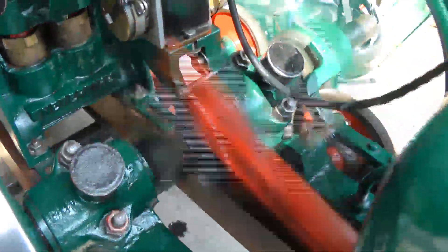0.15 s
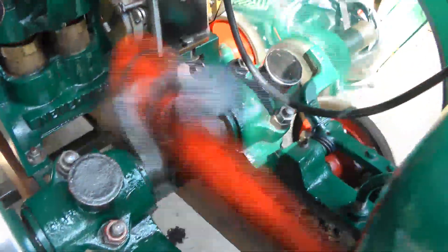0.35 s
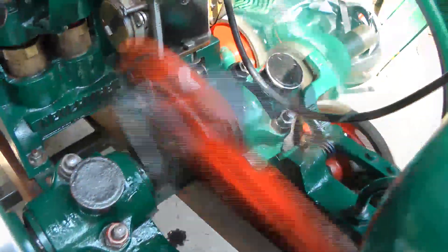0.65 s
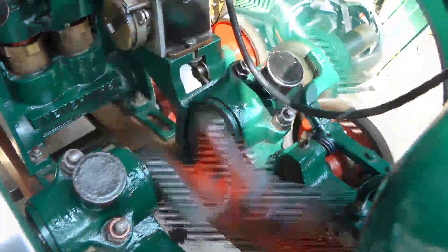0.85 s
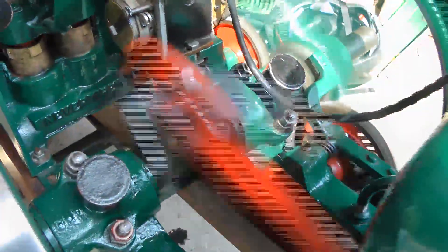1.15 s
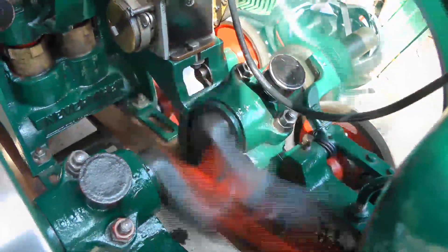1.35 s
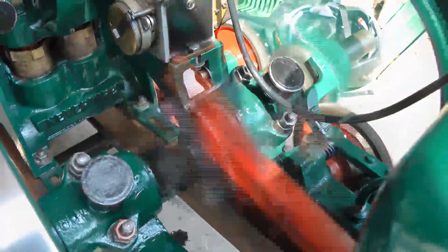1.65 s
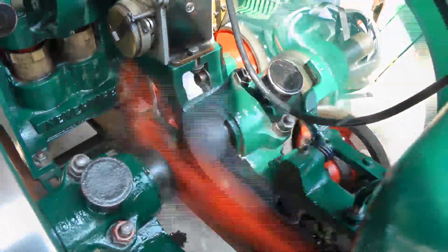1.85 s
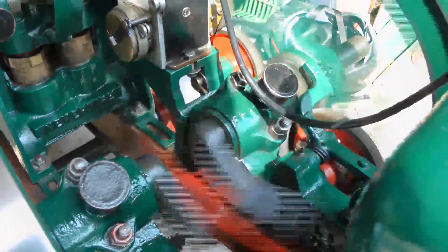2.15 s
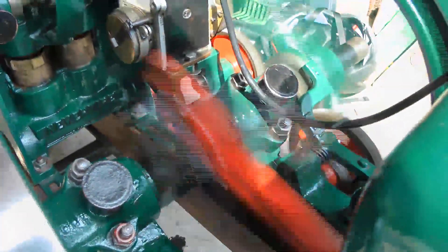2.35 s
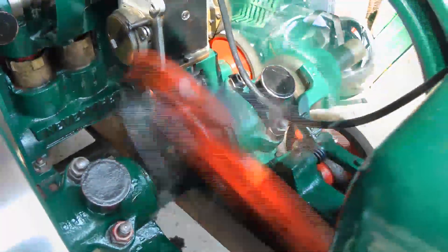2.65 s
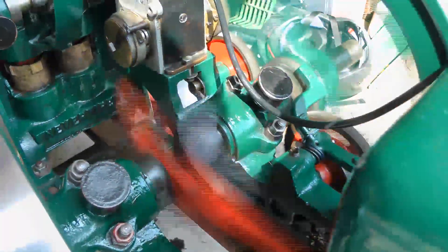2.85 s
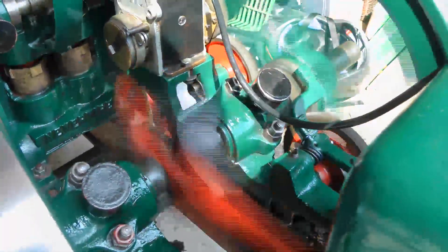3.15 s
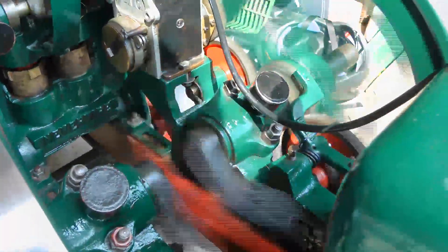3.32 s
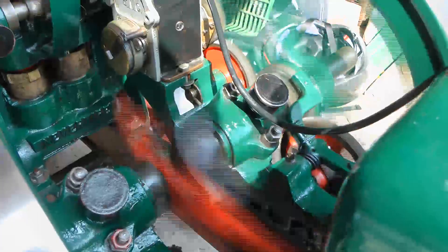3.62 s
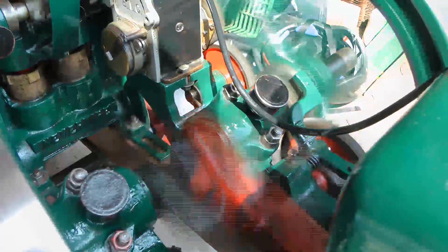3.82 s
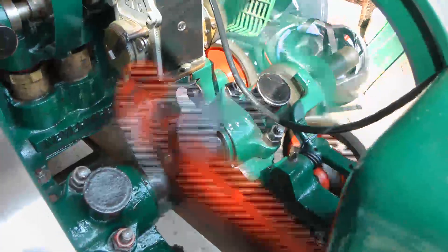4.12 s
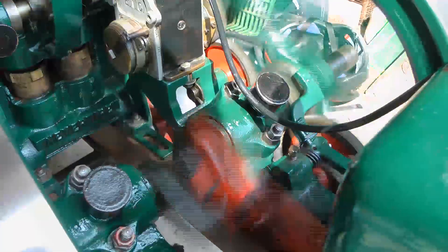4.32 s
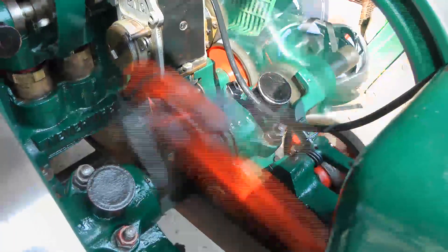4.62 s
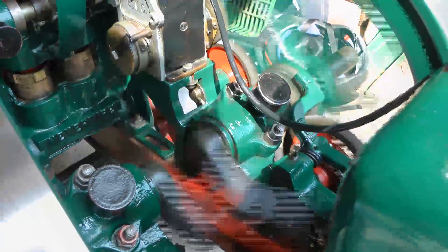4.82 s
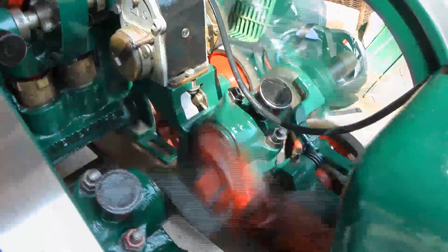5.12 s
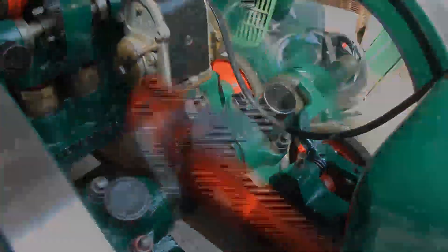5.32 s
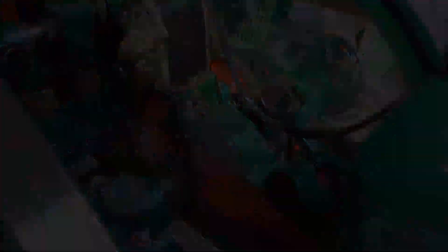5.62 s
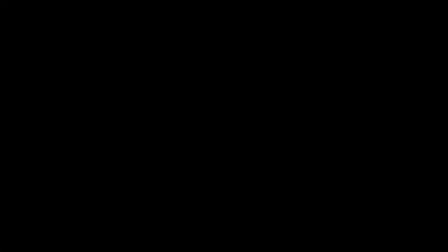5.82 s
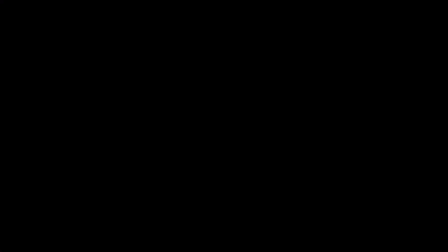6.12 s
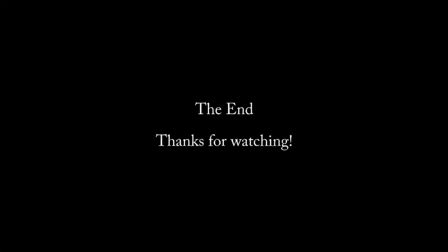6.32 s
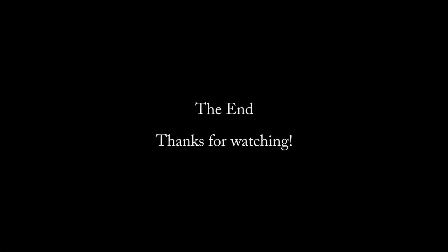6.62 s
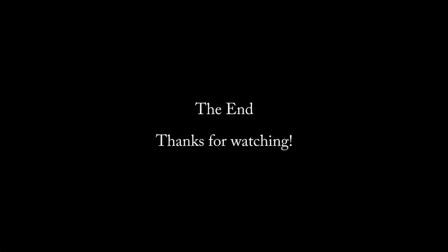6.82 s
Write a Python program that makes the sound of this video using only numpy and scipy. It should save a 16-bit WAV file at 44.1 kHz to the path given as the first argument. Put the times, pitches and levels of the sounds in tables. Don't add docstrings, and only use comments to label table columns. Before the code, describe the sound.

A loose single-cylinder engine coasts with rapid iron knocks, clacks and blown-bottle hoots, fires twice with a sharp bang, then cuts off dead.

```python
import sys
import numpy as np
from scipy import signal
from scipy.fft import rfft, irfft
from scipy.io import wavfile
from scipy.ndimage import uniform_filter1d

SR = 44100
rng = np.random.default_rng(int(sys.argv[2]) if len(sys.argv) > 2 else 0)


def magnitude_from_level(level_db):
    exponent = np.asarray(level_db, float) / 20
    return 10 ** exponent


def int16_out(signal):
    q = np.round(np.clip(np.atleast_2d(signal).T, -1, 1) * 32767)
    wavfile.write(sys.argv[1], SR, q.astype(np.int16))


N = 307597
HZ = np.fft.rfftfreq(N, 1 / SR)


def evened(x):
    return x / np.sqrt(np.mean(x ** 2) + 1e-20)


def read(points):
    hz, value = np.transpose(points)
    return np.interp(np.log(HZ + 1), np.log(hz + 1), value)


def colour(x, gain):
    return irfft(rfft(x) * gain / np.sqrt(np.mean(abs(gain) ** 2)), N)


def add(mix, s, sound):
    part = mix[..., round(s * SR):][..., :sound.shape[-1]]
    part += sound[..., :part.shape[-1]]


def dying_tone(t, hz, fall_s, phase=0):
    return np.sin(2 * np.pi * hz * t + phase) * np.exp(-t / fall_s)


def resonate(x, hz, width):
    r = np.exp(-np.pi * width / SR)
    return 2 * signal.lfilter([1 - r], [1, -r * np.exp(2j * np.pi * hz / SR)], x).real


def excite(x, modes):
    return sum(magnitude_from_level(db) * resonate(x, hz, width) for hz, width, db in modes)


def ticks(per_s, spread_db):
    size = magnitude_from_level(spread_db * np.minimum(rng.exponential(1, N), 4)) * rng.choice([-1, 1], N)
    return evened(size * (rng.random(N) < per_s / SR))


# time in seconds, length in seconds, level in dB.
GUSTS = [
    (0.612, 0.09, 17.5),
    (3.71, 0.085, 18.5),
]
# time in seconds, peak in dB.
PUFFS = [
    (0.586, -21),
    (3.68, -25),
    (5.7652, -13),
]


def draught():
    t = np.arange(SR // 10) / SR
    lumps = evened(uniform_filter1d(rng.standard_normal((2, N)), 1500))
    buffet = rng.standard_normal((2, N)) * magnitude_from_level(5.0 * lumps)
    for s, length, db in GUSTS:
        buffet = buffet * magnitude_from_level(db * np.exp(-((np.arange(N) / SR - s) / length) ** 2))
    rumble = (HZ / (HZ + 25)) ** 2 / (1 + (HZ / 90) ** 2)
    out = magnitude_from_level([[-52.5], [-50.5]]) * evened(colour(buffet, rumble))
    for s, db in PUFFS:
        add(out, s, -magnitude_from_level(db) * dying_tone(t, 90, 0.0032) * np.ones((2, 1)))
    return out


# pitch in Hz, width in Hz, level in dB.
FRAME = [(763, 340, -3), (1127, 12, 1.5), (1344, 53, 2.5), (2000, 61, 1.5), (2252, 29, 6.5),
         (2690, 35, -0.5), (3352, 8.2, -5.5), (3945, 65, -2.5), (4835, 415, 1), (5230, 36, -2),
         (6150, 70, -4)]


def frame(x, ring_db):
    return x + magnitude_from_level(ring_db) * excite(x, FRAME)


# pitch in Hz, width in Hz, level in dB.
SMALL_PARTS = [(8410, 240, 9.5), (9390, 100, 8), (10700, 84, 4.5), (11530, 100, 11.5), (12900, 120, 2),
               (15300, 330, 3)]
ROD_HZ, ROD_T60_S = 3507, 0.14
LATCH_HZ, LATCH_T60_S = 7420, 0.12
# time in seconds, level in dB.
CHATTER = [(0, -19), (.45, -21), (.6, -21.5), (.85, -24), (1.05, -19.5), (1.2, -17), (2.9, -20), (3.7, -19),
           (3.95, -25.5), (4.12, -19.5), (4.27, -18), (5.7, -19), (6.39, -18.5)]
# frequency in Hz, level in dB per Hz.
GEARS = [(59, -48.5), (100, -21), (294, -10.5), (370, -7.5), (448, -6), (1620, -7), (3470, -4.5),
         (5890, -13), (7590, -12.5), (8090, -20), (14000, -36), (15400, -33)]


def chatter():
    s, db = np.transpose(CHATTER)
    rattle = signal.lfilter([1], [1, -np.exp(-1 / (0.0051 * SR))], abs(ticks(110, 1.2)))
    drive = evened(ticks(3000, 2.0) + 0.7 * rng.standard_normal(N))
    drive = drive * (.42 + rattle / rattle.std() * .38)
    body = frame(colour(drive, magnitude_from_level(read(GEARS))), 0.66)
    body += 0.077 * excite(drive, SMALL_PARTS)
    body += 9.2 * resonate(drive, ROD_HZ, 18) + 4.3 * resonate(drive, LATCH_HZ, 45)
    body += 3.5 * resonate(drive, 1124, 7.5) + 3.6 * resonate(drive, 1341, 9.9)
    return evened(body) * magnitude_from_level(np.interp(np.arange(N) / SR, s, db) + 1.13)


# time in seconds, hoot in dB, chuff in dB.
STROKES = [(0.088, -19.5, -18.5), (0.253, -21.5, -29), (0.411, -19, -19), (0.993, -21, -22.5),
           (1.116, -19.5, -18), (1.235, -20.5, -16), (1.369, -14.5, -20), (1.492, -16.5, -15),
           (1.628, -17, -24), (1.745, -17, -19), (1.894, -18, -24.5), (2.03, -19.5, -17.5),
           (2.167, -16.5, -17), (2.307, -18, -15.5), (2.445, -18, -22.5), (2.59, -18.5, -17.5),
           (2.737, -20, -24), (2.887, -16.5, -16), (3.034, -21, -26), (3.189, -18, -15), (3.34, -19, -20),
           (3.494, -20, -16.5), (3.965, -27, -32), (4.068, -22, -24), (4.206, -19, -23), (4.325, -16, -16),
           (4.458, -18.5, -24), (4.585, -18, -14.5), (4.719, -18, -22.5), (4.853, -18, -17.5),
           (4.986, -17.5, -23.5), (5.124, -17.5, -17), (5.259, -17, -20.5), (5.401, -17, -17),
           (5.544, -18, -23.5), (5.686, -18.5, -15), (5.832, -21.5, -23), (5.985, -20, -19),
           (6.128, -19.5, -22), (6.288, -16, -15)]
# seconds from the thump, hoot in dB, chuff in dB.
GULPS = [
    (-0.236, -20.5, -27),
    (-0.202, -17, -26.5),
    (-0.128, -27, -32),
    (-0.046, -23.5, -35.5),
    (0.072, -24.5, -28.5),
]


def hoot_list():
    gulps = [(thump_s + s, db, chuff_db) for _, _, thump_s, _ in FIRINGS for s, db, chuff_db in GULPS]
    return [*STROKES, *gulps]


def hoots():
    tone, chuff, t = np.zeros((2, N)), np.zeros(N), np.arange(SR // 8) / SR
    swell = (t / 0.022 * np.exp(1 - t / 0.022)) ** 4.0
    turns = np.cumsum(376 * (1 + .45 * np.exp(-t / 0.0053))) / SR
    side_lead = np.array([[.45], [-.45]])
    for s, db, chuff_db in hoot_list():
        hoot = swell * np.sin(2 * np.pi * (turns + rng.random()) + side_lead)
        add(tone, s - .024, magnitude_from_level(db + 3.0) * hoot)
        add(chuff, s - .04, magnitude_from_level(chuff_db + 2.0) * swell)
        add(tone, s - .026, magnitude_from_level(db - 4.5) * dying_tone(t, 390, 0.012))
        add(tone, s - .022, magnitude_from_level(chuff_db - 15.0) * dying_tone(t, 110, 0.0045))
    flutter = evened(uniform_filter1d(rng.standard_normal(N), size=400))
    tone = tone * (1 + 0.15 * flutter)
    low_breath = HZ / 800 / (1 + ((HZ - 800) / 300) ** 2)
    high_breath = 0.35 * HZ / 2400 / (1 + ((HZ - 2400) / 900) ** 4)
    air = colour(rng.standard_normal(N), low_breath + high_breath)
    return tone * magnitude_from_level([[-.6], [.6]]), evened(air) * chuff


# time in seconds, big end knock in dB,
# delay of the cam in ms, cam blow in dB, big end knock a turn later in dB.
CYCLES = [(-0.16, -9, 30, -5, -9), (0.148, -4, 27.5, 1, -4), (0.4613, -3, 28.7, 1, -9),
          (0.78, -17, 18, 1, -9), (1.0263, -5, 24.4, 0.5, -4), (1.279, -0.5, 24.5, 1, -2),
          (1.5365, -1, 20.7, -0.5, -7.5), (1.8006, -1.5, 32, -1, -5), (2.0715, -1, 27, -1.5, -3),
          (2.3511, -1, 25, -1, -4.5), (2.638, -3.5, 27, 0, -9.5), (2.935, -3, 25.4, 1.5, -4.5),
          (3.2344, -3.5, 34, 0, -1.5), (3.55, -1.5, 31, -1.5, -9), (3.869, -20.5, 15.3, 0, -10.5),
          (4.1154, -5, 25, -2.5, -5.5), (4.368, -0.5, 29, 0.5, -8.5), (4.627, -1, 26.6, 0.5, -3.5),
          (4.896, -2, 24.3, -1, -6), (5.1654, -3, 29.3, 0.5, -6), (5.442, -2.5, 31.3, 1.5, -6.5),
          (5.731, -4, 29.4, 0.5, -12), (6.0276, -4, 28, 0, -5), (6.3337, -3.5, 31.5, 1, -9)]


def coasting():
    cycles = []
    for row, after in zip(CYCLES, CYCLES[1:]):
        fires = any(0 < thump_s - after[0] < .03 for _, _, thump_s, _ in FIRINGS)
        if not fires:
            cycles.append((row[0], after[0] - row[0], row))
    return cycles


def big_end_knocks():
    second_turn = 0.496
    again = [(s + second_turn * length, row[-1]) for s, length, row in coasting()[1:]]
    return [(s, db) for s, db, *_ in CYCLES[1:]], again


def cam_blows():
    return [(s + ms / 1000, db) for s, _, ms, db, _ in CYCLES[1:]]


def ring(events, mode_hz, t60, beat_hz):
    out, t = np.zeros(N), np.arange(SR // 4) / SR
    luck = rng.random((len(events), 2))
    grit = np.diff(uniform_filter1d(rng.standard_normal((len(events), len(t) + 1)), size=3))
    for (s, db), (a, b), noise in zip(events, luck, grit):
        hz = mode_hz + (b - .5) * beat_hz
        pair = np.sin(2 * np.pi * (hz * t + a)) + .5 * np.sin(2 * np.pi * ((hz + beat_hz) * t + b))
        tone = magnitude_from_level(-60 * t / t60) * pair * np.minimum(t / 0.0024, 1)
        tick = 0.58 * noise * np.exp(-t / 0.0014)
        add(out, s - .002, magnitude_from_level(db + 0.5) * (tone + tick))
    return out


# time in seconds, peak in dB.
ROD = [(0.3232, -9), (0.655, -12), (0.69, -12.5), (0.7477, -20), (0.9323, -9), (1.118, -10), (1.262, -14),
       (1.4316, -17), (1.8262, -9.5), (2.066, -18), (2.2393, -6.5), (2.3526, -13), (2.4523, -15.5),
       (3.04, -8.5), (3.075, -16.5), (3.105, -9), (3.3273, -16), (3.4131, -15), (4.022, -17), (4.2088, -13),
       (4.5116, -16), (4.79, -19), (4.8638, -18), (5.055, -14.5), (5.115, -18.5), (5.27, -15.5),
       (5.468, -10.5), (5.55, -10), (5.7533, -14), (5.907, -14),
       (0.0184, -21), (0.1077, -15), (0.2962, -18.5), (0.4105, -18.5), (0.5681, -16), (1.038, -16),
               (1.1777, -17.5), (1.7489, -22), (1.8986, -15), (1.956, -16), (2.5092, -23.5), (2.5371, -17),
               (2.7447, -14.5), (2.8953, -14), (2.9492, -16.5), (3.4545, -18), (3.6346, -15.5),
               (4.597, -18.5), (4.7207, -21), (4.9711, -19), (5.4181, -17.5), (5.6885, -18.5),
               (5.8396, -16), (6.2013, -17.5)]
LATCH = [(0.0887, -12.5), (0.3227, -7.5), (0.4843, -11), (0.5681, -10.5), (0.6843, -13.5), (1.1812, -14),
         (1.4301, -15), (1.5085, -14), (1.7484, -15), (1.8248, -18), (2.0188, -14.5), (2.2373, -15.5),
         (2.7427, -9), (2.8739, -12), (3.1043, -8), (3.4126, -9), (3.496, -12), (4.3281, -15.5),
         (4.7137, -12.5), (4.8464, -20.5), (4.9137, -13.5), (4.9731, -14.5), (5.2624, -12), (5.5473, -12),
         (5.6825, -14), (5.8167, -12.5), (6.04, -16.5), (5.875, -14.5), (6.2063, -15), (6.3599, -18.5),
         (0.2553, -19.5), (0.3035, -13), (0.7297, -15.5), (0.7532, -12.5), (0.888, -16.5),
                 (1.2353, -14), (1.3625, -16), (1.5562, -18.5), (1.6297, -20), (1.9568, -14.5),
                 (2.157, -21), (2.2932, -13), (2.4488, -18), (2.5855, -21), (2.6628, -15.5), (3.039, -18),
                 (3.0766, -19.5), (3.1346, -17), (3.226, -18), (3.258, -17.5), (3.3278, -17),
                 (3.9434, -19.5), (4.1335, -21.5), (4.2567, -14.5), (4.6503, -16), (4.8633, -13),
                 (5.0538, -20.5), (5.112, -15.5), (5.6115, -18.5), (5.9848, -17.5), (6.137, -26),
                 (6.2801, -21)]


def rod_and_latch():
    rod = [*ROD, *[(s, db - 21.5) for s, db in cam_blows()]]
    latch = LATCH
    return ring(rod, ROD_HZ, ROD_T60_S, 19) + ring(latch, LATCH_HZ, LATCH_T60_S, 44.2)


def clonks(rows, modes, rise_s, wander_hz):
    out, t = np.zeros(N), np.arange(SR // 10) / SR
    hz, mode_db, t60 = np.transpose(modes)[..., None]
    for (s, db), luck in zip(rows, rng.standard_normal((len(rows), 2, len(modes), 1))):
        fall = np.minimum(t / rise_s, 1) * magnitude_from_level(db + mode_db + 3.0 * luck[0] - 60 * t / t60)
        tones = np.sin(2 * np.pi * (hz + wander_hz * luck[1]) * t)
        add(out, s, np.sum(fall * tones, axis=0))
    return out


# time in seconds, peak in dB.
SNAPS = [(0.1805, -15), (0.2518, -15), (0.3217, -24), (0.4853, -18), (0.5671, -16), (0.6814, -16.5),
         (0.7352, -10), (0.9612, -23), (1.056, -16), (1.2106, -17), (1.4296, -23), (1.4671, -19),
         (1.5279, -19), (1.6242, -17.5), (1.6581, -22), (1.8208, -20), (1.8337, -16), (1.8911, -17),
         (2.0592, -22), (2.165, -18), (2.2368, -21), (2.6693, -18), (2.7352, -19), (3.033, -13),
         (3.269, -21), (3.3218, -23.5), (3.3403, -9), (3.6531, -19.5), (3.6691, -15), (3.8227, -10),
         (3.8337, -8), (4.0492, -23), (4.1435, -15), (4.1774, -17), (4.2996, -17), (4.3869, -17),
         (4.6563, -18), (4.7152, -17), (4.9831, -18), (5.2574, -15), (5.4655, -20), (5.7538, -18),
         (6.0516, -18), (6.13, -12), (6.3659, -19)]
# pitch in Hz, level in dB, t60 in seconds.
SPRINGS = [(9300, -0.5, .05), (10700, -4, .04), (11360, -1.5, .05), (12900, -6, .03), (15150, -7.5, .03)]


def springs():
    return magnitude_from_level(-10.0) * clonks(SNAPS, SPRINGS, .0004, 60)


# pitch in Hz, level in dB, t60 in seconds.
BEARING = [(204.4, -25, 0.049), (717, -15, 0.082), (1332, -17.5, 0.045), (1970, -7.5, 0.058),
           (2252, -15.5, 0.054), (2530, -12.5, 0.047)]


def bearing_caps():
    first, again = big_end_knocks()
    return clonks(first, BEARING, 0.0023, 21) + clonks(again, BEARING, 0.0041, 18)


# pitch in Hz, level in dB, t60 in seconds.
HOUSING = [(2286, -19, 0.068), (2650, -25, .09), (3330, -16.5, 0.05), (4700, -24, .06), (5270, -15, 0.044),
           (6140, -22, .06)]


def cam_housing():
    bounces = [(s + .008, db + 0.5) for s, db in cam_blows()]
    return clonks(cam_blows() + bounces, HOUSING, .002, 30)


# time in seconds, peak in dB, pitch in Hz.
CRACKS = [(0.149, -2, 2010), (0.18, 1, 5100), (0.304, -3, 1980), (0.461, -3, 2010), (0.494, 1.5, 3370),
          (0.567, -1, 3520), (0.747, -2, 3580), (0.792, -2.5, 2830), (0.961, -5, 2860), (1.048, -1, 2250),
          (1.279, 0, 1950), (1.408, -2, 1970), (1.524, -5, 4680), (1.537, 0.5, 2500), (1.8, -1, 4230),
          (2.212, -3, 1970), (2.237, -4, 3550), (2.352, 0, 3490), (2.661, 0.5, 1990), (2.932, -3, 2250),
          (2.964, 0, 3300), (3.236, -4, 1990), (3.267, 0, 3320), (3.392, -3, 1970), (3.549, -2, 2000),
          (3.634, -2, 2960), (3.719, -5, 4510), (4.142, 0, 3520), (4.626, -3, 1980), (4.76, -4, 2000),
          (4.966, -4, 3510), (5.188, 0, 1990), (5.471, 1.5, 3330), (5.731, -1, 4610), (5.754, 1, 3480),
          (5.879, -6, 1950), (6.027, -4, 2000), (6.179, -5, 2000), (6.335, -2.5, 1963), (6.367, 0.5, 3285)]


def cracks():
    out, t = np.zeros(N), np.arange(SR // 40) / SR
    grit = rng.standard_normal((len(CRACKS), len(t)))
    for (s, db, hz), noise in zip(CRACKS, grit):
        tick = 0.34 * uniform_filter1d(noise, size=3) * np.exp(-t / .0016)
        tick = tick + .7 * dying_tone(t, hz, .003)
        add(out, s, magnitude_from_level(db - 5.0) * np.minimum(t / .0006, 1) * tick)
    return out


# time in seconds, peak in dB, rattle length in ms.
TAPPET = [(0.002, -4, 4.6), (0.115, -9, 6.1), (0.2544, 1, 3), (0.3244, -16, 11), (0.357, -5, 19),
          (0.678, -5.5, 12), (1.09, -4.5, 28), (1.507, -15.5, 7.3), (1.526, -2.5, 5.1), (2.147, -3.5, 3.5),
          (2.2368, -15, 8.3), (2.4523, -2, 2.9), (3.037, -6, 2.6), (3.321, -5, 9.9), (3.416, -2, 3.9),
          (3.5079, -6.5, 17), (4.178, -6, 29), (4.8636, -11, 15), (4.968, -2.5, 3.4), (5.545, -7.5, 3.6),
          (5.835, -2.5, 3.1), (5.9062, -7, 22), (6.11, -13.5, 10.6)]
# time in seconds, peak in dB.
SLACK = [(0.0775, -8), (1.213, -5), (2.5384, -12.5), (2.715, -11.5), (2.845, -8.5), (4.8292, -8.5),
         (5.149, -9.5), (5.3605, -13), (5.3798, -5.5), (5.5227, -13.5), (5.8106, -10)]
# seconds from the thump, peak in dB,
# weight in dB, sharpness in dB, rattle length in ms.
TRIP = [(-0.2445, -2.5, -10.5, -24.5, 5.5), (-0.2252, -5, -16.5, -10, 9), (-0.209, -2, -11.5, -5.5, 10),
        (-0.161, -8, -15, -8.5, 24), (-0.0615, -16.5, -18.5, -4, 6), (-0.045, -2, -15, -11, 13),
        (0.016, -11.5, -20, -4, 10), (0.1697, -10, -11.5, -7.5, 5)]
# time in seconds, peak in dB.
PINS = [(0.18, -11.5), (0.2518, -17.5), (0.4094, -30.5), (0.8884, -22), (0.9612, -17.5), (1.056, -14.5),
        (1.2106, -13.5), (1.4296, -22.5), (1.4671, -10.5), (1.5279, -13), (1.834, -14), (2.0592, -17.5),
        (2.2368, -21), (2.6698, -16.5), (3.033, -14), (3.34, -9.5), (3.6536, -15.5), (4.049, -22),
        (4.1435, -13.5), (4.1774, -17), (4.2632, -26), (4.3004, -12), (4.3894, -12), (4.558, -16),
        (4.7152, -14), (4.8628, -28), (4.9834, -15), (5.2574, -14), (5.7538, -17), (6.129, -13)]
# time in seconds, peak in dB.
RATTLES = [(0.022, -12.5), (0.39, -4), (0.437, -17), (0.531, -18.5), (0.71, -14), (0.89, -14.5),
           (1.257, -9.5), (1.38, -5.5), (1.609, -12.5), (2.061, -8.5), (2.43, -8.5), (2.573, -5.5),
           (2.61, -10.5), (2.9, -10.5), (3.016, -12), (3.259, -5.5), (3.48, -5), (3.757, -12.5),
           (3.775, -10.5), (3.784, -11), (3.867, -8.5), (3.939, -11), (4.249, -7), (4.332, -6.5),
           (4.35, -6.5), (4.439, -10), (4.482, -12.5), (4.7, -9), (4.722, -7), (4.731, -9.5), (4.819, -11),
           (4.993, -7), (5.245, -5), (5.419, -7.5), (5.615, -6), (5.695, -4), (5.882, -12), (5.919, -8.5),
           (5.984, -6.5), (6.005, -11), (6.208, -7), (6.312, -12)]


def knock_list():
    first, again = big_end_knocks()
    rows = [(s, db, -12.5, -22, 12.7) for s, db in first]
    rows += [(s, db, -11, -19.5, 7.8) for s, db in again]
    rows += [(s, db, -18.5, -12.5, ms) for s, db, ms in TAPPET]
    rows += [(s, db, -10, -19.5, 21.5) for s, db in SLACK]
    rows += [(thump_s + s, *blow) for _, _, thump_s, _ in FIRINGS for s, *blow in TRIP]
    rows += [(s, db, -12, 3.1, 2.9) for s, db in PINS]
    rows += [(s, db, -16.5, -15, 4.1) for s, db in RATTLES]
    cams = [(s, db, -22.5, -13.5, 9.8, 0.0054) for s, db in cam_blows()]
    return [(*row, 0.0016) for row in rows] + cams


# frequency in Hz, level in dB per Hz.
IRON = [(18, -62.5), (30, -33.5), (277, -9.5), (370, -2.5), (444, -9), (1370, -12), (1520, -9.5),
        (3410, -6), (6740, -14), (7480, -14), (8090, -24), (15600, -37)]


def knocks(rows):
    out, t, hz = np.zeros(N), np.arange(2560) / SR, np.fft.rfftfreq(2560, 1 / SR)
    drive = evened(ticks(3000, 3.0) + 0.6 * rng.standard_normal(N))
    low, high = 1 / (1 + (hz / 1500) ** 6), 1 / (1 + (6000 / (hz + 1)) ** 8)
    iron = np.interp(hz, HZ, magnitude_from_level(read(IRON)))
    spots = rng.random((len(rows), 2, 20))
    for (s, db, weight_db, sharp_db, ms, slack_s), (place, share) in zip(rows, spots):
        rise = slack_s * magnitude_from_level(1.3 * db) + 0.0017
        fall = np.exp(-np.maximum(t - rise, 0) * 1000 / np.clip(ms, 2, 30))
        shape = np.minimum(t / rise, 1) ** 1.27 * fall
        mode_hz = 500 * 26 ** place[:, None]
        peaks = share[:, None] / (1 + 2j * (hz - mode_hz) / (60 + 0.032 * mode_hz))
        modes = 0.45 + 1.9 * np.sum(peaks, axis=0)
        phase = modes / abs(modes)
        bands = [evened(band * iron * abs(modes)) * phase for band in (low, 1 - low - high, high)]
        gain = magnitude_from_level([db + weight_db - 6.0, db - 12.5, db + sharp_db - 8.5]) @ bands
        start = max(s - 0.8 * rise, 0)
        impacts = shape * drive[round(start * SR):][:len(t)]
        add(out, start, irfft(rfft(impacts) * gain))
        add(out, s, magnitude_from_level(db + weight_db - 21.0) * dying_tone(t, 190, .003))
    body = frame(out, 4.5) + excite(out, SMALL_PARTS)
    return body + 1.0 * resonate(out, ROD_HZ, 22) + 3.3 * resonate(out, LATCH_HZ, 40)


# exhaust opens in seconds, hiss in dB, thump in seconds, thump in dB.
FIRINGS = [
    (0.727, -11, .7927, 3.5),
    (3.815, -11, 3.8797, 3.5),
]
# frequency in Hz, level in dB per Hz.
JET = [(120, -45), (200, -14.5), (497, -12), (1330, -18.5), (2220, -11), (2470, 3), (4680, -8.5),
       (5710, -2.5), (8000, 0), (15600, -11)]


def firings():
    out, jet = np.zeros(N), colour(rng.standard_normal(N), magnitude_from_level(read(JET)))
    ragged = 1 + np.sin(np.arange(N) / 180.0)
    for s, length, _ in GUSTS:
        out += magnitude_from_level(-30.0) * jet * np.exp(-((np.arange(N) / SR - s - .03) / length) ** 2) * ragged
    t = np.arange(SR // 5) / SR
    for s, db, thump_s, thump_db in FIRINGS:
        blow = np.minimum(t / 0.022, 1) ** 3 * (.5 + np.exp(-t / 0.02)) / (1 + (t / 0.09) ** 8)
        blow = blow * (1 - .6 * np.exp(-((t + s - thump_s - .003) / .004) ** 2))
        add(out, s, magnitude_from_level(db) * blow * jet[round(s * SR):][:len(t)])
        front = dying_tone(t, 480, 0.0021) * np.minimum(t / 0.00052, 1)
        add(out, thump_s, magnitude_from_level(thump_db) * front)
        edge = dying_tone(t, 900, 0.0019, -0.8) * np.minimum(t / 0.00039, 1)
        add(out, thump_s, magnitude_from_level(thump_db - 4.0) * edge)
        add(out, thump_s + .004, magnitude_from_level(thump_db - 6) * dying_tone(t, 2550, 0.0037) * t / 0.0043)
        add(out, thump_s + 0.0044, magnitude_from_level(thump_db - 10) * dying_tone(t, 1500, .003) * t / .003)
        add(out, thump_s, -magnitude_from_level(thump_db - 23.5) * dying_tone(t, 75, .007))
        add(out, thump_s + 0.0018, magnitude_from_level(thump_db - 13.5) * dying_tone(t, 260, 0.0041))
    return out


# frequency in Hz, likeness from 0 to 1.
SAME = [(60, 0.73), (130, 0.93), (300, 0.89), (950, 0.86), (3770, 0.93), (15000, 0.97)]
# frequency in Hz, left over right in dB.
LEAN = [(100, -3.5), (1000, -2), (2300, -2.5), (3500, -0.5), (12000, -0.5)]


def ports(x):
    t = np.arange(SR // 10) / SR
    scatter = rng.standard_normal(len(t)) * np.exp(-t / 0.019)
    scatter = rfft(scatter / np.linalg.norm(scatter), N)
    apart = np.sqrt((1 - np.clip(read(SAME), 0, 1)) / 2) * scatter
    lean = magnitude_from_level(read(LEAN) / 2)
    return irfft(rfft(x) * np.array([(1 + apart) * lean, (1 - apart) / lean]), N)


def scene():
    hoot, chuff = hoots()
    iron = knocks(knock_list()) + bearing_caps() + cam_housing()
    engine = ports(chatter() + chuff + rod_and_latch() + iron + firings())
    return draught() + hoot + springs() + cracks() + engine


def band_limit(x):
    return signal.sosfilt(signal.butter(12, 15710, fs=SR, output="sos"), x)


def record(dry):
    t, stop_s = np.arange(N) / SR, 6.3885
    fade = np.where(t < stop_s, 1, magnitude_from_level(-62 - 5000 * (t - stop_s)))
    rounded = 1.044 * np.tanh(dry / 1.327)
    edged = irfft(rfft(rounded) * (HZ < 15750), N)
    return band_limit(edged * fade)


dry = scene()
out = record(dry)
int16_out(out)
```